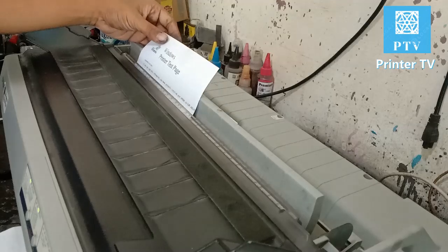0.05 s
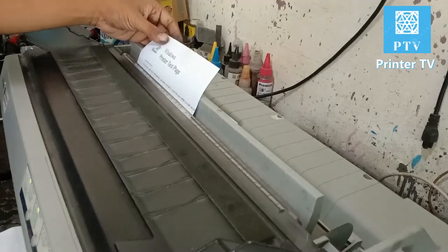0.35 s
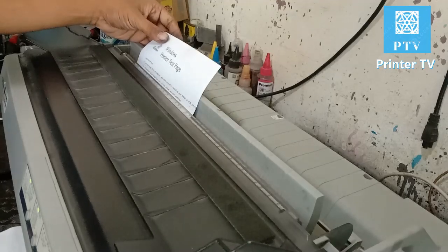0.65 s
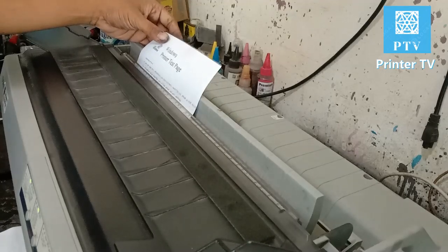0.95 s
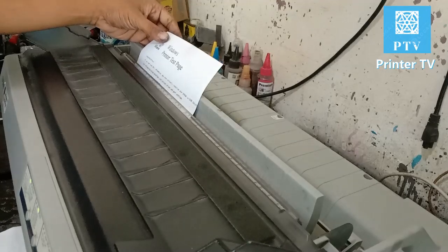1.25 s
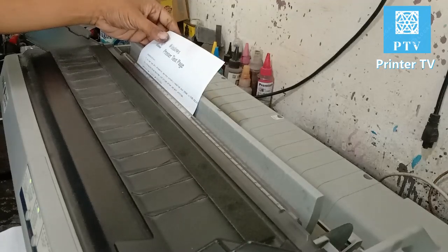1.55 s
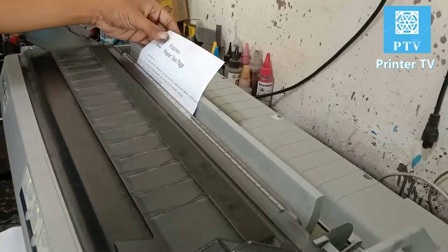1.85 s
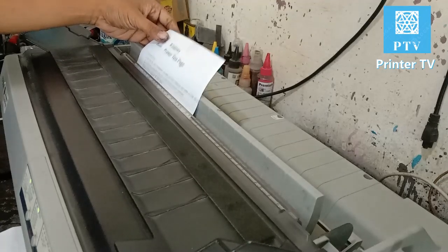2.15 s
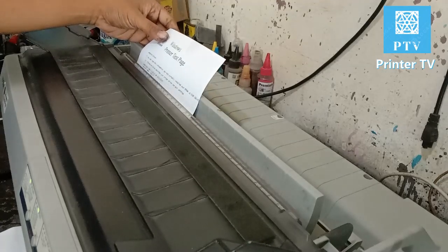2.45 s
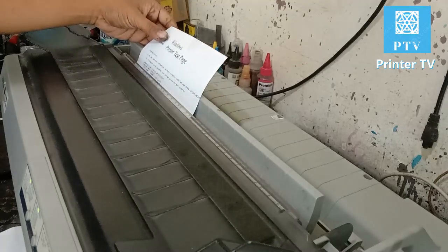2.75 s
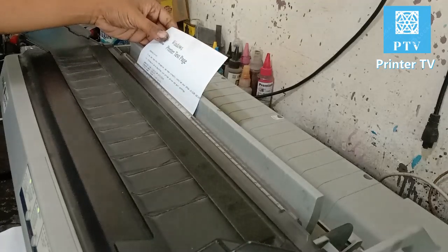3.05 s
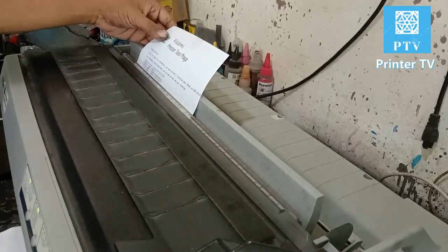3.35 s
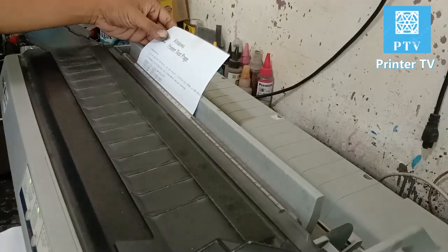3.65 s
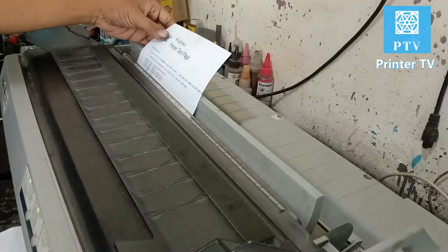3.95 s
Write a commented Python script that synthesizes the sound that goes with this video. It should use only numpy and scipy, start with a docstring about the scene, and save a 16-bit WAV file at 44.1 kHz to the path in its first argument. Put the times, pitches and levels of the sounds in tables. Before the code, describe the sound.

Dot matrix printer rasping out lines in bursts, its carriage rattling faintly between them.

```python
"""Dot matrix printer in a small room

Lines of text are printed, heard from just above the cover. The pins strike on a fixed column clock: their
regular part is a whine, the changing dot patterns a harsh rasp. The carriage rumbles and rattles along its rail
and clatters as it reverses; a stepper motor advances the paper between lines. The case shudders now and then,
and a short squeak sounds once."""
import sys
import numpy as np
from scipy import signal
from scipy.fft import rfft, irfft, next_fast_len
from scipy.io import wavfile
from scipy.ndimage import uniform_filter1d, map_coordinates

SR = 44100
rng = np.random.default_rng(int(sys.argv[2]) if len(sys.argv) > 2 else 0)


def persist_wave(psi):
    """Save psi, clipped to +-1, as 16-bit WAV."""
    counts = np.round(np.clip(psi, -1, 1) * 32767).astype(np.int16)
    wavfile.write(sys.argv[1], SR, np.atleast_2d(counts).T)


N = 176400
TIME_S = np.arange(N) / SR
COLUMN_HZ, LETTER_COLUMNS = 2167.5, 15


def amp(db):
    """Decibels to gain."""
    return 10 ** (np.asarray(db) / 20)


def unit(x):
    """Scale to rms 1."""
    return x / np.sqrt(np.mean(np.abs(x) ** 2) + 1e-20)


def along(points, hz):
    """Interpolate (freq_hz, value) points on a log axis."""
    freq_hz, values = np.transpose(points)
    return np.interp(np.log(hz + 1), np.log(freq_hz + 1), values)


def curves(rows):
    """One value per sample for each column after time_s."""
    time_s, *columns = np.transpose(rows)
    return [np.interp(TIME_S, time_s, column) for column in columns]


def wobble(rate_hz):
    """Smooth random curve, rate_hz knots a second."""
    coarse = np.arange(0, N + 32, 32)
    smooth = map_coordinates(rng.standard_normal(4096), [coarse * rate_hz / SR + 2], mode="wrap")
    return np.interp(np.arange(N), coarse, smooth)


def waver(depth, rate_hz):
    """Complex gain of rms 1, wandering in size and phase."""
    return unit(1 + depth * (wobble(rate_hz) + 1j * wobble(rate_hz)))


def tone(hz, depth, rate_hz):
    """Wavering sine of rms 1."""
    return np.sqrt(2) * np.real(waver(depth, rate_hz) * np.exp(2j * np.pi * (hz * TIME_S + rng.random())))


def filtered(x, response):
    """Apply a gain given as a function of frequency."""
    size = next_fast_len(N + SR // 2)
    return irfft(rfft(x, size) * response(np.fft.rfftfreq(size, 1 / SR)), size)[:N]


def coloured(x, spectrum):
    """Shape x by (freq_hz, gain_db) points, to rms 1."""
    return unit(filtered(x, lambda hz: amp(along(spectrum, hz))))


def shifting(x, depth_db, size):
    """Each narrow band swells and sinks on its own; rms 1."""
    bands = signal.stft(x, nperseg=size)[2]
    swell = uniform_filter1d(rng.standard_normal(bands.shape), size=2, axis=0)
    swell = unit(uniform_filter1d(swell, size=7, axis=1))
    return unit(signal.istft(bands * amp(depth_db * np.clip(swell, -2, 1)), nperseg=size)[1][:N])


def gate(start_s, end_s, attack_s=0.004, release_s=0.0041):
    """Quick rise at the start, exponential fall after the end."""
    rise = 1 - np.exp(-np.maximum(TIME_S - start_s, 0) / attack_s)
    return rise * np.exp(-np.maximum(TIME_S - end_s, 0) / release_s)


def pulses(times_s, sizes, width=16):
    """Clicks placed between samples."""
    at = times_s[:, None] * SR
    taps = np.floor(at).astype(int) + np.arange(width) - width // 2 + 1
    shape = np.sinc(taps - at) * np.cos(np.pi * (taps - at) / width) ** 2
    return np.bincount(np.clip(taps, 0, N).ravel(), (sizes[:, None] * shape).ravel(), N + 1)[:N]


# dot pattern at 1, 2 and 3 times the letter rate: depth
STEM_DEPTHS = [0.14, 0.72, 0.2]
# pin strike spectrum: freq_hz, gain_db
RASP_SPECTRUM = [(800, -27.5), (1450, -11), (2050, 0), (2450, -5.5), (2780, -9.5), (3550, 0), (3750, -3),
                 (4450, -1), (4720, 10), (4880, 2), (5050, 5.5), (5900, 1), (6300, 3.5), (6850, 4),
                 (7700, -10.5), (12200, -10), (13500, -1.5), (15400, -10)]
def rasp(pin_groups=6, letter_spread_db=2, pin_spread_db=5, ring_t60_s=0.025, ring_gain=1.7):
    """Each pin group strikes in changing dot patterns and rings head and platen in its own way."""
    column = np.arange(int(N / SR * COLUMN_HZ))
    letter = column // LETTER_COLUMNS
    stems = sum(depth * np.cos(2 * np.pi * k * column / LETTER_COLUMNS)
                for k, depth in enumerate(STEM_DEPTHS, 1))
    weight = amp(letter_spread_db * rng.uniform(-0.98, 1, len(column))[letter]) * np.maximum(1 + stems, 0)
    t = np.arange(SR // 30) / SR
    strikes = np.zeros(N)
    for _ in range(pin_groups):
        dots, usage = rng.uniform(-0.9, 1, (2, len(column)))
        sizes = weight * amp(pin_spread_db * usage[letter]) * dots
        ring = rng.standard_normal(len(t)) * amp(-60 * t / ring_t60_s)
        ring *= ring_gain / np.linalg.norm(ring)
        ring[0] += 1  # the bare strike
        strikes += signal.fftconvolve(pulses((column + rng.random()) / COLUMN_HZ, sizes), ring)[:N]
    return shifting(coloured(strikes, RASP_SPECTRUM), depth_db=3.5, size=512)


# whine harmonic 2: time_s, relative_db
SECOND_HARMONIC = [(0.01, -26.5), (0.1, -37.4), (0.15, -24.1), (0.29, -33.2), (0.44, -25.6), (0.79, -32.9),
                   (0.89, -23.0), (0.99, -32.6), (1.22, -26.3), (1.48, -33.0), (1.9, -28.9), (1.95, -35.8),
                   (2.1, -27.2), (3.01, -30.5), (3.11, -25.2), (3.44, -33.7), (3.49, -24.6), (3.64, -32.6),
                   (4.0, -29.1)]
# whine harmonic 3: time_s, level_db
THIRD_HARMONIC = [(0.01, -22), (0.34, -26), (0.79, -20.5), (0.94, -28.5), (1.17, -20), (1.27, -21),
                  (2.43, -25.5), (2.48, -19), (2.83, -30), (3.01, -19.5), (3.16, -25.5), (4.0, -21.5)]
# whine harmonics 4 to 7: level_db
UPPER_HARMONICS_DB = [-32.5, -35, -34, -29.5]
# side tones: letter_rate_multiple
SIDE_ORDERS = [27, 28, 32, 33]
# the same side tones: level_db
SIDE_LEVELS_DB = [-44.5, -40, -43, -50]
def whine(fundamental, printing, drift_rad=0.31, text_depth=0.51):
    """Harmonics of the column clock, the higher the less steady, and side tones of the letter rhythm."""
    phase = 2 * np.pi * COLUMN_HZ * TIME_S + drift_rad * wobble(9)
    second = amp(3.5 + curves(SECOND_HARMONIC)[0])
    third = amp(curves(THIRD_HARMONIC)[0]) * unit(1 + text_depth * wobble(72))  # swells with the text
    upper = [amp(db) * waver(depth=0.36, rate_hz=26) for db in UPPER_HARMONICS_DB]
    levels = [amp(0.5) * fundamental] + [printing * level for level in [second, third, *upper]]
    harmonics = np.zeros(N)
    for k, level in enumerate(levels, 1):
        flutter = waver(depth=0.15 * k, rate_hz=150)
        harmonics += np.sqrt(2) * np.real(level * flutter * np.exp(1j * k * phase))
    sides = sum(amp(db) * tone(k * COLUMN_HZ / LETTER_COLUMNS, depth=0.87, rate_hz=12)
                for k, db in zip(SIDE_ORDERS, SIDE_LEVELS_DB))
    return harmonics + printing * sides


# runs of print: start_s, end_s, rasp_relative_db, fundamental_relative_db
PRINT_RUNS = [(-.02, 0.139, -14, -24), (0.14, 0.223, -13, -28.5), (0.246, 0.26, -11, -29),
              (0.267, 0.375, -13.5, -32.5), (0.38, 0.403, -16, -23), (0.406, 0.46, -15.5, -22),
              (0.654, 0.713, -12, -19.5), (0.708, 0.754, -14.5, -34), (0.75, 0.919, -15, -21.5),
              (0.911, 1.017, -16, -24), (1.098, 1.359, -14, -22), (1.361, 1.458, -15, -30.5),
              (1.477, 1.54, -12, -30.5), (1.717, 1.73, -11.5, -30), (1.737, 1.757, -12.5, -37),
              (1.763, 1.777, -11.5, -22), (1.787, 1.798, -8, -20), (1.824, 1.92, -14, -29.5),
              (1.92, 2.183, -16.5, -23.5), (2.266, 2.39, -15, -21), (2.373, 2.536, -13, -21.5),
              (2.522, 2.63, -13, -34.5), (2.822, 2.85, -12, -34), (2.855, 2.89, -12.5, -26.5),
              (2.911, 3.002, -13, -26.5), (3.004, 3.169, -14, -21.5), (3.169, 3.272, -15, -27.5),
              (3.356, 3.638, -14.5, -22.5), (3.638, 3.718, -15.5, -31), (3.877, 3.893, -12.5, -29.5),
              (3.898, 3.911, -9, -23), (3.935, 4.02, -13, -26.5)]
def print_head(rasp_gain_db=-5, strike_send_db=-8, whine_send_db=-19):
    """Pins rasp and whine during each run; these and the carriage's clack echo in the room."""
    force, fundamental, printing = np.zeros((3, N))
    for start_s, end_s, rasp_db, fundamental_db in PRINT_RUNS:
        on = gate(start_s, end_s, attack_s=0.0024)
        force = np.maximum(force, amp(rasp_db) * on)
        fundamental = np.maximum(fundamental, amp(fundamental_db) * on)
        printing = np.maximum(printing, on)
    strikes = clack() + amp(rasp_gain_db) * force * rasp()
    tones = whine(fundamental, printing)
    return strikes + tones + room(amp(strike_send_db) * strikes + amp(whine_send_db) * tones)


# room decay: freq_hz, t60_s
ROOM_DECAY = [(2000, 0.66), (15000, 0.34)]
def room(x):
    """Diffuse tail whose treble dies first."""
    hz, t, bands = signal.stft(rng.standard_normal(SR // 2), SR, nperseg=256)
    tail = signal.istft(bands * amp(-60 * t / along(ROOM_DECAY, hz)[:, None]), SR, nperseg=256)[1]
    return signal.fftconvolve(x, tail / np.linalg.norm(tail))[:N]


# carriage noise: time_s, rattle_relative_db, rumble_relative_db
CARRIAGE_LEVELS = [(0, -48.5, -48), (.45, -40.5, -45.5), (.95, -44, -45), (1.65, -30, -35),
                   (1.84, -39.5, -60), (2.0, -35, -42), (2.55, -38.5, -41), (3.2, -30.5, -35.5),
                   (3.44, -25.5, -35.5), (3.6, -29, -43.5), (4, -30.5, -38.5)]
# rail rattle: freq_hz, gain_db
RATTLE_SPECTRUM = [(150, -11), (280, -14), (450, -1), (880, -9.5), (1150, -1.5), (2000, -10.5),
                   (12000, -31.5)]
# low rumble: freq_hz, gain_db
RUMBLE_SPECTRUM = [(32, -23), (50, -4), (100, 0.5), (150, -1.5), (220, -19.5), (400, -37)]
# case resonances: pitch_hz, relative_db
CASE_MODES = [(293, -14), (350, -13.5), (430, -13.5), (1420, -12)]
def carriage(hum_hz=96.2, ring_swing_db=4.5, rumble_swing_db=4.65):
    """The carriage rattles and rumbles on its rail and rings the case, over the hum of its drive."""
    rattle_db, rumble_db = curves(CARRIAGE_LEVELS)
    rough_noise = rng.standard_normal(N) * amp(0.89 * wobble(250))
    rattle = amp(-3) * shifting(coloured(rough_noise, RATTLE_SPECTRUM), depth_db=9.5, size=1024)
    ring = sum(amp(db) * unit(amp(ring_swing_db * wobble(14)) * tone(hz, depth=3.0, rate_hz=49))
               for hz, db in CASE_MODES)
    rumble = amp(-2.5) * coloured(rng.standard_normal(N), RUMBLE_SPECTRUM)
    hum = amp(-3) * tone(hum_hz, depth=0.8, rate_hz=12)
    low_gain = amp(rumble_db + rumble_swing_db * wobble(18))
    return amp(rattle_db) * (rattle + ring) + low_gain * (rumble + hum)


def singing(level_db=-47):
    """Thin tone at twice the column rate; it goes on between lines."""
    return amp(level_db) * tone(2 * COLUMN_HZ, depth=0.73, rate_hz=14)


# line feeds: start_s, length_s, level_db
LINE_FEEDS = [(0.493, 0.076, -35), (1.576, 0.051, -34), (2.651, 0.045, -30.5), (3.756, 0.063, -31.5)]
# modes rung by each step: pitch_hz, relative_db, t60_s
GEAR_MODES = [(301, 5.5, 0.081), (1077, 2.5, 0.059)]
def paper_feed(step_hz=97.9, scatter_db=5.5):
    """Each motor step knocks the gears and the case: a short pitched rattle."""
    t = np.arange(SR // 10) / SR
    ring = sum(amp(db - 60 * t / t60_s) * np.sin(2 * np.pi * hz * t) for hz, db, t60_s in GEAR_MODES)
    steps_s = np.arange(0, N / SR, 1 / step_hz)
    sizes = amp(scatter_db * rng.standard_normal(len(steps_s)))
    knocks = unit(signal.fftconvolve(pulses(steps_s, sizes), ring)[:N])
    return knocks * sum(amp(db) * gate(start_s, start_s + length_s, release_s=0.027)
                        for start_s, length_s, db in LINE_FEEDS)


# carriage reversals: start_s, length_s, level_db
TURNS = [(0.504, 0.098, -34.5), (1.025, 0.073, -36), (1.591, 0.12, -32), (2.771, 0.072, -31),
         (3.309, 0.055, -33.5)]
def reversals(knock_hz=130, knock_t60_s=0.092):
    """Belt and gears knock unevenly as the carriage brakes and changes direction."""
    level = sum(amp(db) * gate(start_s, start_s + length_s, release_s=0.021)
                for start_s, length_s, db in TURNS)
    beats = np.arange(int(N / SR * knock_hz))
    lateness, sizes = rng.random((2, len(beats)))
    t = np.arange(SR // 10) / SR
    blows = signal.fftconvolve(pulses((beats + lateness) / knock_hz, sizes), amp(-60 * t / knock_t60_s))
    clatter = coloured(blows[:N] * rng.standard_normal(N), RATTLE_SPECTRUM)
    return level * shifting(clatter, depth_db=8, size=1024)


def clack(start_s=0.547, length_s=0.017, level_db=-20.5):
    """One short, bright clack as the carriage turns."""
    noise = coloured(rng.standard_normal(N), RASP_SPECTRUM)
    return amp(level_db) * gate(start_s, start_s + length_s) * noise


# case shudders: peak_s, level_db
SHUDDERS = [(.625, -33), (.69, -33.5), (1.095, -29.5), (1.575, -28), (1.715, -30), (2.261, -28.5),
            (2.592, -31.5), (2.88, -32.5), (3.059, -22)]
def shudders(pitch_hz=102.3, half_width_s=0.024):
    """Soft low shudders of the case, a few cycles each."""
    level = sum(amp(db) * np.exp(-((TIME_S - peak_s) / half_width_s) ** 2) for peak_s, db in SHUDDERS)
    ring = tone(pitch_hz, depth=0.5, rate_hz=20)
    return level * unit(ring + 0.91 * coloured(rng.standard_normal(N), RUMBLE_SPECTRUM))


def squeak(start_s=2.5, length_s=0.04, pitch_hz=1430, level_db=-27.5):
    """One rough, brief squeak."""
    return amp(level_db) * gate(start_s, start_s + length_s) * tone(pitch_hz, depth=1, rate_hz=140)


def scene():
    """The whole printer, mono."""
    return (singing() + squeak() + print_head() + carriage() + reversals() + shudders() + paper_feed())[None]


def record(dry):
    """Brick-wall low-pass."""
    top_hz = 15500
    return filtered(dry[0], lambda hz: hz < top_hz)[None]


dry = scene()
out = record(dry)
persist_wave(out)
```